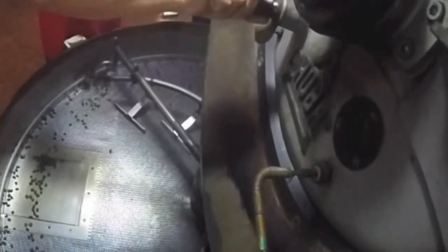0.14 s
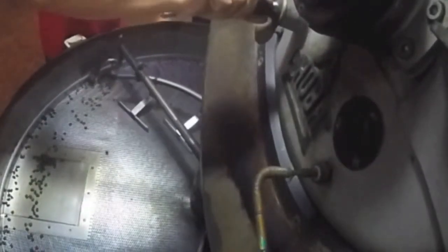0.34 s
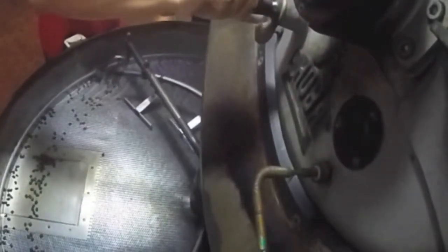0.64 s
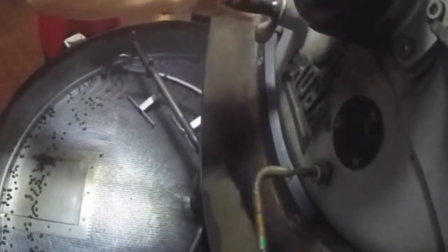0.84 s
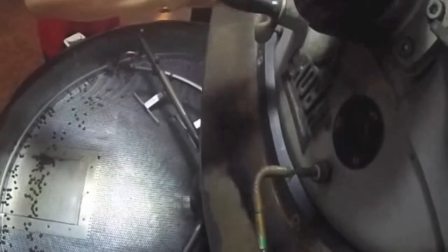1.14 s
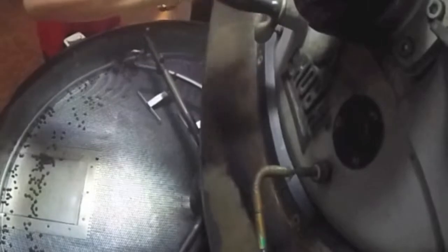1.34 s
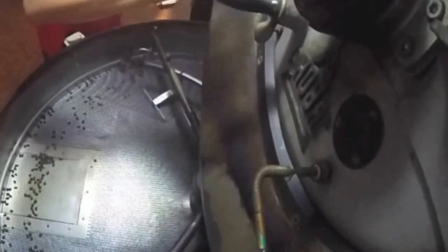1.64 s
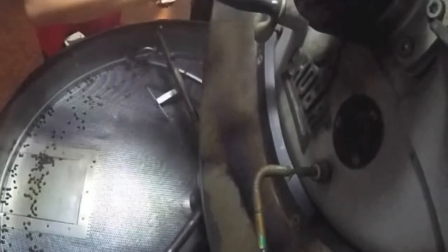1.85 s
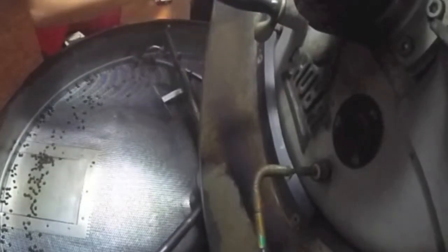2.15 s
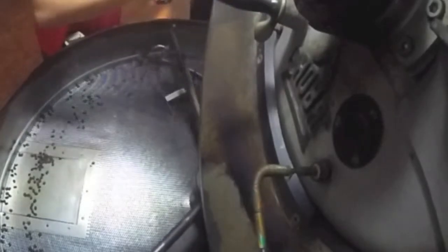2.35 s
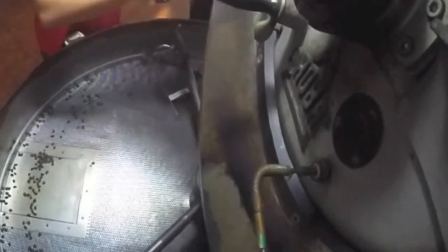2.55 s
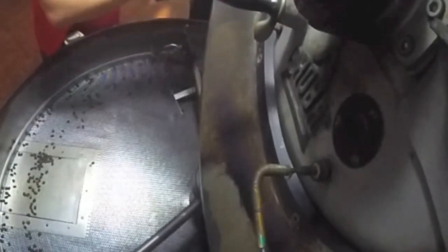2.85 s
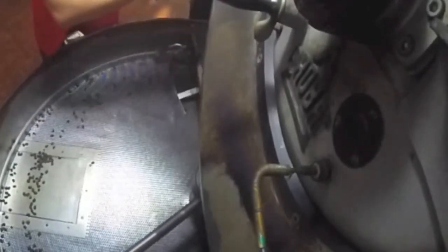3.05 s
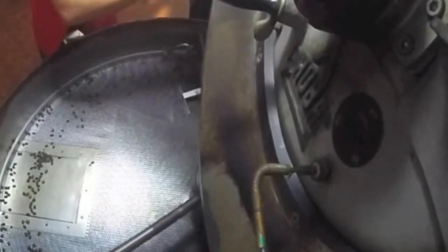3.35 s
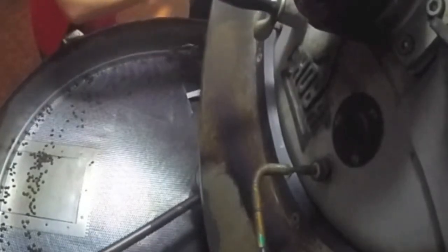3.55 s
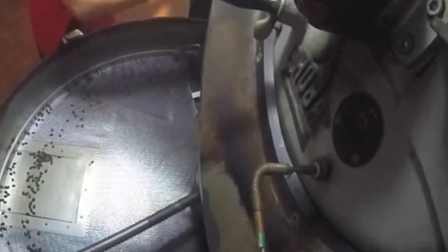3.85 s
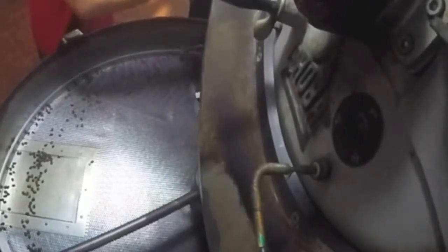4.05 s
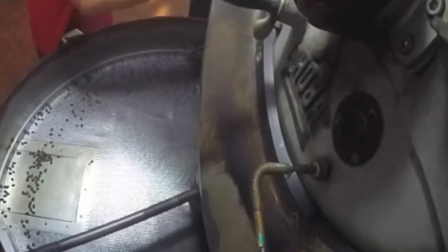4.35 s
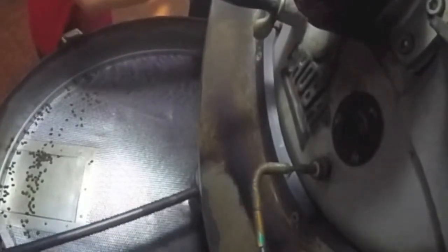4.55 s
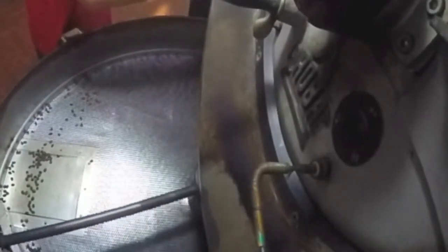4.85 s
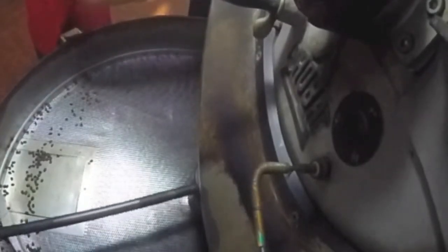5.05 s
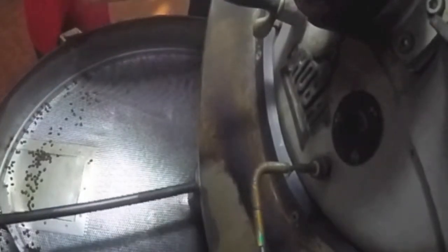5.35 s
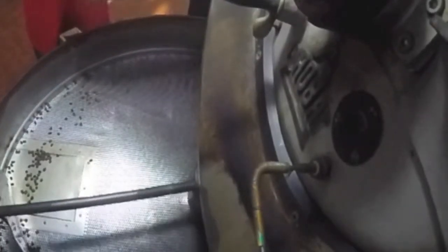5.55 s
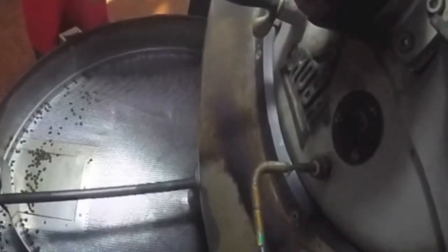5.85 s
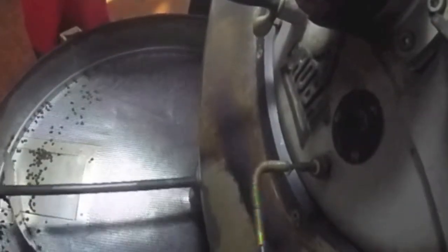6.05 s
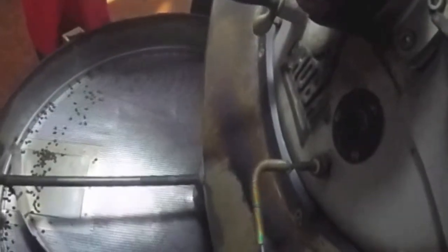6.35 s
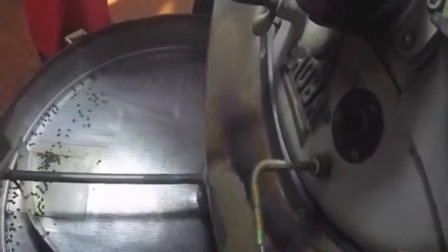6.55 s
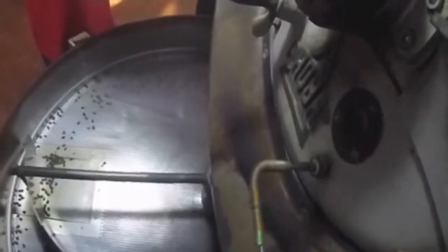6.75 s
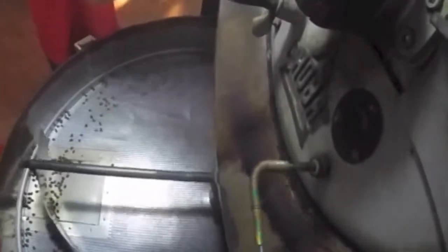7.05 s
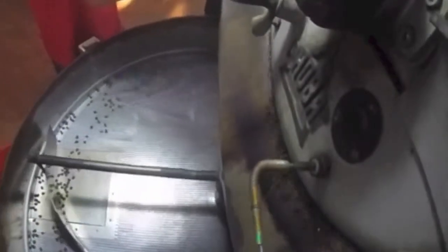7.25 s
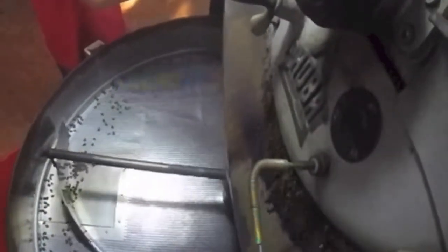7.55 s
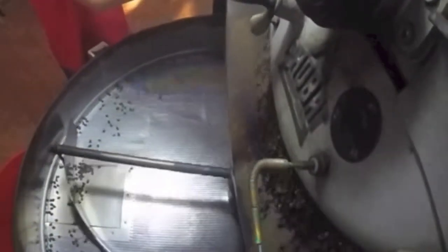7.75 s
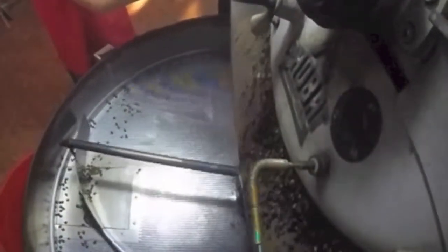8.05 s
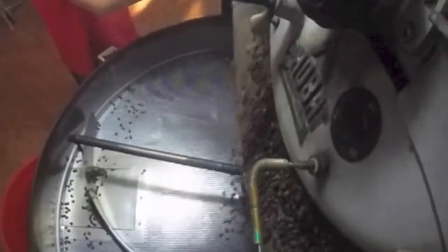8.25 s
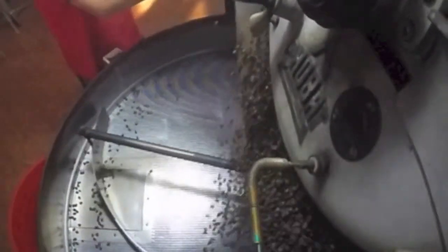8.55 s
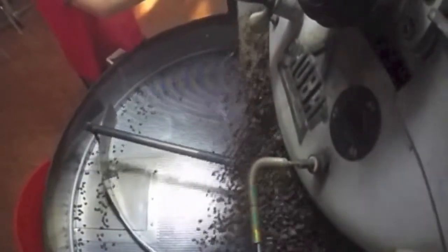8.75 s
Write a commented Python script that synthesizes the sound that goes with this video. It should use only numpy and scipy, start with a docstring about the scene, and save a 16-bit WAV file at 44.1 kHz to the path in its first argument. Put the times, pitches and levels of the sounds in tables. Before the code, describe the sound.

Deep, muffled slow-motion hum of a bean roaster, with scattered metallic knocks and a swelling rumble of beans spilling into a tray.

```python
"""A roasting machine in slow motion, about eight times slower than life. From the start, motor and fan
throb deeply, the drum booms, and beans tumble inside it and knock on sheet steel. Near 3 s the stirring
arm scrapes the tray floor. The boom swells until, at about 7 s, the beans start to pour into the cooling
tray; they are loudest at the end. All along, the slowed sound has only 6000 samples a second, joined by
straight lines, which leaves faint mirror copies of it in the treble."""
import sys
import numpy as np
from scipy import signal
from scipy.fft import rfft, irfft, next_fast_len
from scipy.io import wavfile
from scipy.ndimage import uniform_filter1d, map_coordinates

SR = 44100
rng = np.random.default_rng(int(sys.argv[2]) if len(sys.argv) > 2 else 0)


def int16_out(signal):
    """Quantize to a 16-bit WAV file."""
    q = np.round(np.clip(np.atleast_2d(signal).T, -1, 1) * 32767)
    wavfile.write(sys.argv[1], SR, q.astype(np.int16))


N = 392490

# load on the drum, greatest as the beans start to leave it: time_s, load_0_to_1
DRUM_LOAD = [(0, 0.08), (2.8, 0.29), (4.8, 0.41), (6, 0.52), (7.05, 0.76), (7.14, 0.98), (7.3, 0.87),
             (7.75, 0.92), (7.95, 0.5), (8.5, 0.63), (8.9, 0)]
# tone colour of the motor's throb: pitch_hz, gain_db
THROB_COLOUR = [(3, 9), (20, -30.5), (28, -17.5), (40, -36.5), (66, -120)]
# tone colour of the drum's boom: pitch_hz, gain_db
BOOM_COLOUR = [(18, -13), (26, -9.5), (34, 2.5), (55, -5.5), (68, -12), (80, -15.5), (130, -40.5),
               (200, -120)]
# tone colour of the fan's air: pitch_hz, gain_db
AIR_COLOUR = [(50, -64.5), (80, -5), (115, 2), (148, -7.5), (167, 2.5), (177, -3.5), (187, 1), (205, -9),
              (300, -59)]
# the main hum swells and sinks: time_s, level_db
MAIN_HUM_LEVELS = [(0, -48), (1.56, -30), (1.96, -40.5), (2.15, -31.5), (2.58, -42), (2.75, -34),
                   (3.08, -30), (3.5, -37), (3.62, -26), (3.99, -42), (4.11, -28), (4.49, -38),
                   (4.78, -24.5), (5.15, -33), (5.57, -29.5), (5.7, -40.5), (6.3, -35), (6.9, -39.5),
                   (7.14, -28.5), (7.34, -43), (8.9, -41.5)]
# tones of motor, drum and fan: pitch_hz, width_hz, idle_db, full_load_adds_db
MACHINE_TONES = [(6.89, .93, -23.5, 7), (15.15, 1.5, -20.5, 3), (42.04, 2.5, -44.5, 24)]
# two thin tones that come up late: time_s, low_hum_db, whine_db
THIN_TONE_LEVELS = [(0, -47, -52.5), (2.9, -44.5, -54.5), (3.05, -46, -42.5), (3.6, -39, -55.5),
                    (5, -45.5, -52.5), (6.8, -38.5, -51), (7.2, -32.5, -39), (7.55, -34, -40),
                    (7.9, -46.5, -39.5), (8.2, -32.5, -47), (8.6, -37, -44), (8.9, -47, -48)]
# that low hum and that whine: pitch_hz, width_hz
THIN_TONE_PITCHES = [(96.5, 1.5), (512, 1.5)]
# how loud the tumbling beans are: time_s, roar_db, patter_db
BEAN_LEVELS = [(0, -33, -55.5), (.3, -41, -61.5), (1.7, -39.5, -56), (2.9, -38.5, -55.5), (3.1, -35, -55),
               (3.44, -38, -54.5), (4.6, -36.5, -54.5), (5.13, -34.5, -50.5), (5.55, -36, -52.5),
               (6.1, -34, -48.5), (6.25, -32, -42.5), (6.7, -32, -45), (7.06, -31.5, -48.5),
               (7.6, -30, -43), (7.75, -30.5, -46), (7.96, -28.5, -48), (8.2, -29.5, -44),
               (8.7, -28.5, -44), (8.9, -28.5, -39.5)]
# tone colour of the sliding heap of beans: pitch_hz, gain_db
ROAR_COLOUR = [(82, -32), (140, -2), (156, -14.5), (204, -9), (263, -5.5), (312, -8.5), (350, -5.5),
               (450, -11), (520, -7), (745, -13), (823, -16.5), (1090, -30), (1200, -27.5), (1560, -39.5),
               (2640, -120)]
# tone colour of the pattering beans: pitch_hz, gain_db
PATTER_COLOUR = [(470, -32.5), (800, -14), (1080, -14), (1660, -15), (1830, -12), (1900, -12), (2470, -50),
                 (4180, -120)]
# single beans knocking on steel: start_s, clink_peak_db, hardness_0_to_1
BEAN_KNOCKS = [(0.3898, -35, 1), (0.546, -45, 1), (.7554, -40.5, 0.7), (1.6, -40.5, .5), (1.65, -40.5, 0.7),
               (1.856, -34, 0.9), (1.97, -41.5, 0.4), (2.8637, -21.5, .95), (2.9471, -33, 0.7),
               (3.2312, -33.5, 0.5), (3.6858, -28, 0.9), (3.8406, -35, 0.9), (4.0066, -30, 0.9),
               (4.1567, -35, .7), (4.3295, -31.5, 1), (5.0454, -35.5, 0.8), (5.2453, -37.5, 0.3),
               (5.3191, -36.5, 0.5), (5.599, -28, 1), (5.732, -30, 1), (5.8607, -37.5, 0.8),
               (5.9354, -29.5, .3), (5.975, -34.5, 0.3), (6.0301, -34.5, 0.3), (6.1299, -39, .4),
               (6.175, -25.5, 0.6), (6.2181, -16, 0.5), (6.2571, -25.5, 0.4), (6.3141, -14, 0.7),
               (6.4702, -29, 0.1), (6.5462, -19.5, 0.6), (6.6135, -24, 0.6), (6.669, -24.5, .4),
               (6.7661, -32, 0.1), (6.7976, -36.5, .2), (6.976, -34.5, 0), (7.036, -37.5, .2),
               (7.654, -11.5, 0.6), (7.7598, -28, 0.5), (8.0216, -27.5, 0), (8.2197, -26, 0.5),
               (8.2596, -32, 0.5), (8.3231, -36, 0), (8.4404, -29.5, 0), (8.5761, -21.5, 0.4),
               (8.6179, -24.5, 0.2), (8.8507, -32, 0)]
# the clink of a hard contact: pitch_hz, width_hz, gain_db
CLINK_RINGS = [(1200, 420, -5), (1630, 380, 0)]
# the ringing steel wall of the drum: pitch_hz, width_hz, gain_db
WALL_RINGS = [(330, 71, -1.5), (605, 35, -6.5), (826, 260, 7)]
# dull thuds of the drum wall: start_s, peak_db, pitch_hz
WALL_THUDS = [(2.969, -26.5, 382), (3.014, -22.5, 397), (3.144, -24, 584), (4.408, -33, 288),
              (6.474, -20, 353), (6.548, -16, 627), (6.689, -21, 508), (6.947, -24, 556), (6.973, -25, 272),
              (7.624, -20.5, 522), (8.025, -13.5, 675), (8.061, -21, 539), (8.258, -18, 528),
              (8.606, -12.5, 404), (8.615, -11.5, 590), (8.811, -17, 667)]
# the ringing tray floor: pitch_hz, width_hz, gain_db
TRAY_RINGS = [(423, 32, 6), (533, 34, 2.5), (815, 110, -7), (1410, 95, -16), (1790, 170, -15)]
# time the room's echo takes to fall by 60 dB: pitch_hz, fade_s
ROOM_FADES = [(200, 0.24), (800, 0.97), (1900, 1)]
# the steep top edge of the slowed sound: pitch_hz, gain_db
TREBLE_CUT = [(1700, 0), (1890, -4), (1912, -8), (1925, -26), (1980, -36), (2040, -120)]
# weak, very fast beats from the change of sample rate: multiple_of_beat, depth_db
RATE_BEATS = [(1, -65), (3, -78), (4, -90)]
# tone colour of the faint hiss: pitch_hz, gain_db
HISS_COLOUR = [(1900, -0.5), (2300, -8), (3500, -16.5), (8000, -18.5), (15000, -25)]

SLOW_SAMPLES_PER_S, TREBLE_EDGE_HZ, BEAT_HZ, TOP_HZ = 6000, 1912, 3900, 15700


def machine():
    """The motor throbs, the drum booms and the fan blows; more load means more boom."""
    load, = curves(DRUM_LOAD)
    throb = amp(-25.5) * coloured(rng.standard_normal(N), THROB_COLOUR)
    boom = amp(-35 + 15.5 * load) * coloured(rng.standard_normal(N), BOOM_COLOUR)
    air = amp(-40.5) * coloured(rng.standard_normal(N), AIR_COLOUR)
    return throb + boom + air


def machine_hums():
    """Motor, drum and fan hum in wavering tones; the three deepest grow with the load."""
    load, = curves(DRUM_LOAD)
    main_db, = curves(MAIN_HUM_LEVELS)
    out = hum(main_db + 1.6 * wobble(per_s=10), hz=128.7, width_hz=1.5)
    for hz, width_hz, idle_db, load_db in MACHINE_TONES:
        out += hum(idle_db + load_db * load + 2.5 * wobble(per_s=4), hz, width_hz)
    for level_db, (hz, width_hz) in zip(curves(THIN_TONE_LEVELS), THIN_TONE_PITCHES):
        out += hum(level_db + 1.6 * wobble(per_s=4), hz, width_hz)
    return out


def tumbling_beans():
    """The heap of beans slides with a dull roar; single beans patter above it."""
    roar_db, patter_db = curves(BEAN_LEVELS)
    patter = tiny_hits(per_s=90, spread_db=2, fade_s=.06)
    slide = tiny_hits(per_s=500, spread_db=1.2, fade_s=.27)
    roar = coloured(slide + .3 * patter, ROAR_COLOUR)
    far_beans = .9 * rng.standard_normal(N)  # too far away to hear one by one
    return amp(roar_db) * roar + amp(patter_db) * coloured(patter + far_beans, PATTER_COLOUR)


def bean_knocks():
    """A bean clinks and the steel wall rings; the hardest knocks are bright and barely move the wall."""
    out = np.zeros(N + SR)
    (low_hz, low_width_hz, low_db), high_ring = CLINK_RINGS
    for start_s, peak_db, hardness in BEAN_KNOCKS:
        contact = ringing([(low_hz, low_width_hz, low_db - 10 * hardness), high_ring])
        clink = strike(lambda f: contact(f) / (1 + 1j * f / TREBLE_EDGE_HZ) ** 2, fade_s=.026, blow=8)
        wall = strike(ringing(WALL_RINGS), fade_s=.11, blow=9.3)
        wall_db = -.5 + .66 * peak_db - 13 * hardness  # grows more slowly than the clink
        out[round(start_s * SR):][:len(clink)] += amp(peak_db) * clink + amp(wall_db) * wall
    return out[:N]


def wall_thuds():
    """A soft contact sounds just one part of the drum wall and leaves the treble out."""
    out = np.zeros(N + SR)
    for start_s, peak_db, hz in WALL_THUDS:
        wall = ringing([(hz, .51 * hz, 0)])
        thud = amp(peak_db) * strike(lambda f: wall(f) ** 2, fade_s=.07, blow=40)
        out[round(start_s * SR):][:len(thud)] += thud
    return out[:N]


def arm_scrape(start_s=2.94, rise_s=.004, fade_s=2.23):
    """The stirring arm catches on the tray floor and drags free."""
    age_s = np.maximum(np.arange(N) / SR - start_s, 0)
    loudness = (1 - np.exp(-age_s / rise_s)) * amp(-31.5 - 60 * age_s / fade_s)
    rubbing = tiny_hits(per_s=120, spread_db=2, fade_s=.097)
    return loudness * normalised(filtered(rubbing, ringing(TRAY_RINGS)))


def room_echo(x):
    """The room echoes x, and each pitch dies away at its own speed."""
    hz, t, noise = signal.stft(rng.standard_normal(SR), SR, nperseg=512)
    fade = amp(-60 * t / look_up(ROOM_FADES, hz)[:, None])
    tail = signal.istft(noise * fade, SR, nperseg=512)[1]
    dull_tail = filtered(tail, lambda f: f < TREBLE_EDGE_HZ)[:SR]
    return signal.fftconvolve(x, normalised(dull_tail) / np.sqrt(SR))[:N]


def hum(level_db, hz, width_hz):
    """A tone that wanders a little around its pitch."""
    drift = np.cumsum(rng.standard_normal(N)) * np.sqrt(2 * np.pi * width_hz / SR)
    phase = 2 * np.pi * hz * np.arange(N) / SR + uniform_filter1d(drift, size=1500)
    return amp(level_db) * np.sqrt(2) * np.sin(phase)


def tiny_hits(per_s, spread_db, fade_s):
    """Random hits, each a short puff of noise; a few are much bigger than the rest."""
    when, size = rng.random((int(per_s * N / SR), 2)).T
    hits = np.bincount((when * N).astype(int), amp(-2 * spread_db * np.log(1 - size)), N)
    power = signal.lfilter([1], [1, -amp(-120 / (fade_s * SR))], hits)
    return normalised(np.sqrt(np.abs(power)) * rng.standard_normal(N))


def strike(response, fade_s, blow):
    """One clean blow and a dying rattle, sent through a ringing filter; the peak is 1."""
    t = np.arange(8192) / SR
    push = amp(-60 * t / fade_s) * (1 - np.exp(-t / .0015)) * rng.standard_normal(len(t))
    push[0] = blow
    ring = irfft(rfft(push) * response(np.fft.rfftfreq(len(t), 1 / SR)))
    return ring / np.abs(ring).max()


def ringing(rings):
    """The filter of an object that rings at a few pitches; narrower ones ring longer."""
    return lambda f: sum((-1) ** k * amp(db) * 1j * f * width / (hz * hz - f * f + 1j * f * width)
                         for k, (hz, width, db) in enumerate(rings))


def wobble(per_s):
    """A smooth curve through per_s random points a second."""
    points = rng.standard_normal(int(N * per_s / SR) + 4)
    return map_coordinates(points, [np.arange(N) * per_s / SR])


def coloured(x, colour):
    """Give x a tone colour and an average strength of 1."""
    return normalised(filtered(x, lambda hz: amp(look_up(colour, hz))))


def filtered(x, response):
    """Multiply each frequency in x by response(hz)."""
    size = next_fast_len(N + SR // 2)
    return irfft(rfft(x, size) * response(np.fft.rfftfreq(size, 1 / SR)), size)[:N]


def curves(table):
    """Turn each column after time_s into one value per sample."""
    time_s, *columns = np.transpose(table)
    return [np.interp(np.arange(N) / SR, time_s, column) for column in columns]


def look_up(table, hz):
    """Read between a table's rows on a musical (log) pitch scale."""
    pitches, values = np.transpose(table)
    return np.interp(np.log(hz + 1), np.log(pitches + 1), values)


def normalised(x):
    """Scale x to an average strength (rms) of 1."""
    return x / np.sqrt(np.mean(x ** 2) + 1e-20)


def amp(db):
    """Turn decibels into a plain multiplier."""
    return 10 ** (np.asarray(db) / 20)


def scene():
    """Add everything into one channel; only the knocks and thuds echo."""
    hits = bean_knocks() + wall_thuds()
    roaster = machine() + machine_hums() + tumbling_beans() + arm_scrape()
    return (roaster + hits + amp(-23) * room_echo(hits))[None]


def record(dry):
    """Cut the treble, join widely spaced samples with straight lines, then add weak beats and hiss."""
    dull = filtered(dry[0], lambda hz: amp(look_up(TREBLE_CUT, hz)))
    t, fine_t = np.arange(N) / SR, np.arange(4 * N) / (4 * SR)
    sparse_t = np.arange(int(t[-1] * SLOW_SAMPLES_PER_S) + 1) / SLOW_SAMPLES_PER_S
    sparse = map_coordinates(dull, [sparse_t * SR], order=3)
    lines = np.interp(fine_t, sparse_t, sparse)  # the corners mirror the sound into the treble
    joined = signal.resample_poly(lines, 1, 4)
    beats = sum(amp(db) * np.cos(2 * np.pi * multiple * BEAT_HZ * t) for multiple, db in RATE_BEATS)
    beating = joined * (1 + beats)  # the throb shows up again just above and below each beat
    hiss = amp(-88.5) * coloured(rng.standard_normal(N), [(1800, -120)] + HISS_COLOUR)
    return filtered(beating + hiss, lambda hz: hz < TOP_HZ)[None]


dry = scene()
out = record(dry)
int16_out(out)
```